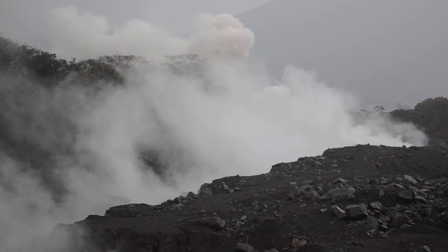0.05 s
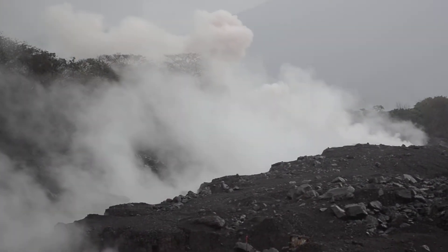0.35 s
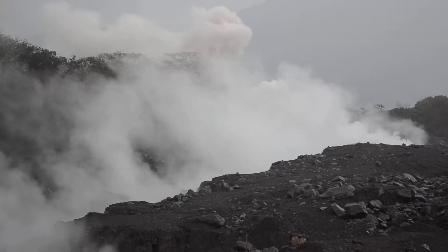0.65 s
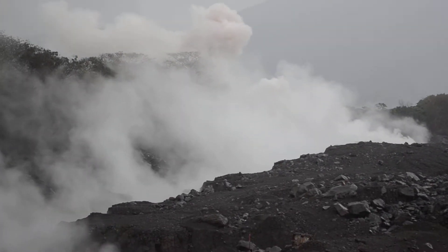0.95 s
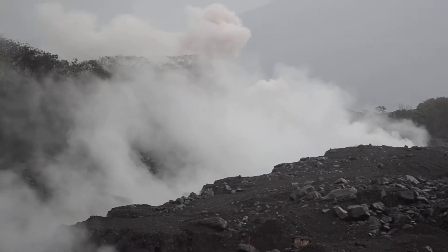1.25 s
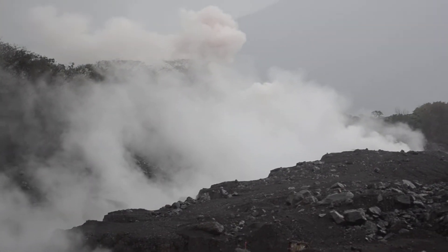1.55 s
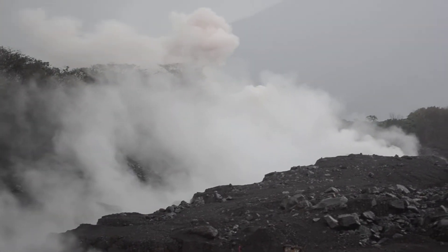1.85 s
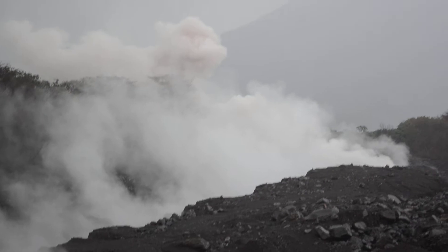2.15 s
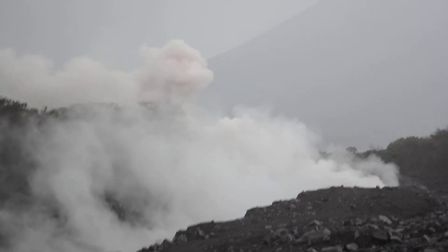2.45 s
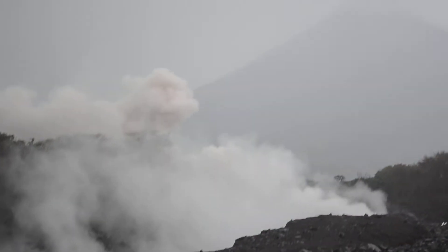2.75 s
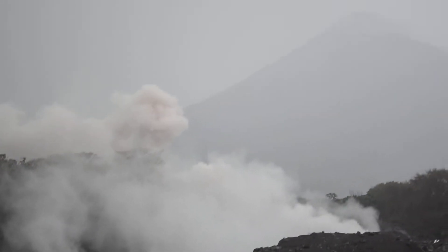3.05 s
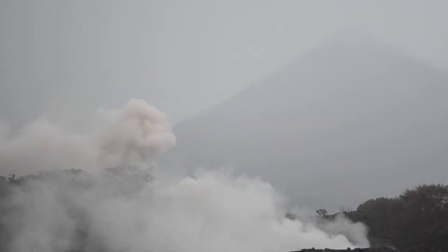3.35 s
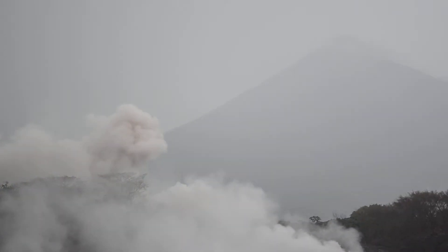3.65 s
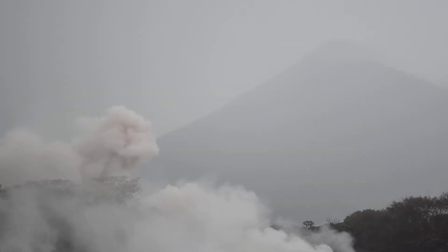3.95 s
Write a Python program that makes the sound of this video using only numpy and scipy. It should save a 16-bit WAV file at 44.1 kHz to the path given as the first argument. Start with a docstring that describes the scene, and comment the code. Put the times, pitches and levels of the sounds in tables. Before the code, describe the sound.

A hot mudflow roars steadily down a ravine for all four seconds, heard from the rim outdoors. Stones knock dully inside the roar under a faint hiss, and wind gusts buffet the microphone with a lumpy low rumble. At about 2.2 seconds a tiny tick sounds close by, and a very faint high whine grows slightly. At 3 seconds a dull pop tops a strong gust as the flow continues.

```python
"""A hot mudflow roars steadily down a ravine, heard from the rim in the open air.
From the start, colliding stones knock dully inside the roar, under a faint hiss, and gusts buffet
the microphone with a lumpy low rumble that booms near 100 and 200 Hz. At 2.2 s one tiny tick sounds
close by, and a very faint high whine then grows a little. At 3 s a dull pop tops a strong gust,
and the flow roars on."""
import sys
import numpy as np
from scipy import signal
from scipy.fft import rfft, irfft
from scipy.io import wavfile
from scipy.ndimage import uniform_filter1d

SR = 44100
rng = np.random.default_rng(int(sys.argv[2]) if len(sys.argv) > 2 else 0)


def dump(signal):
    """Clip the signal to [-1, 1] and save it as 16-bit WAV at the path in sys.argv[1]."""
    limited = np.clip(np.atleast_2d(signal).T, -1, 1)
    pcm = np.round(limited * 32767).astype(np.int16)
    wavfile.write(sys.argv[1], SR, pcm)


N = 176400

# Levels in the tables are relative; spectra give density per hertz.
# spectrum of the flow's roar (frequency [Hz], level [dB])
ROAR_SPECTRUM = [(10, -28), (24, -6), (60, -7), (130, 0.5), (345, -0.5), (395, -4), (455, 1), (490, -7.5),
                 (545, -0.5), (630, 2), (715, -1.5), (765, 1.9), (815, -2.5), (920, 1), (1040, -2.5),
                 (1200, 1), (1600, -2.5), (1900, -5.5), (2200, -7), (3000, -15), (3900, -22), (4600, -26),
                 (5600, -36.5), (8000, -41.5), (15000, -69)]
# slow swell of the roar (time [s], level [dB])
ROAR_SWELL = [(0, -0.5), (.7, -0.7), (1.6, -0.33), (2.5, -0.5), (3.05, -0.75), (3.4, -0.8), (4, -0.6)]
# narrow mid band of the roar, fading as the microphone tilts up (time [s], level [dB])
MID_BAND_LEVEL = [(0, -1), (.7, 1), (1.9, 0.7), (2.5, -2.5), (3.1, -4), (3.6, -6), (4, -8)]
# spectrum of the hiss (frequency [Hz], level [dB])
HISS_SPECTRUM = [(2000, -6.5), (5500, 0.5), (7000, -0.5), (8400, -0.5), (9600, -3.5), (12200, -5),
                 (14000, -11), (15600, -20)]
# envelope of the hiss (time [s], level [dB])
HISS_ENVELOPE = [(0, -0.5), (.9, -0.8), (1.5, 1), (2.3, .3), (3.1, -1), (3.5, -0.7), (4, -1)]
# strength of the wind on the microphone (time [s], level [dB])
GUST_ENVELOPE = [(0.0, -25.5), (0.04, -19.5), (0.15, -26.5), (0.42, -32), (0.465, -18.5), (0.49, -36),
                 (0.54, -23.5), (0.615, -34), (0.625, -28), (0.64, -15.5), (0.675, -14.5), (0.7, -13.5),
                 (0.76, -19), (0.79, -31), (0.82, -18.5), (0.86, -32), (0.885, -23), (0.97, -25),
                 (1.01, -29.5), (1.05, -17), (1.12, -24), (1.18, -16.5), (1.235, -20), (1.26, -16.5),
                 (1.3, -23.5), (1.34, -24), (1.37, -17.5), (1.4, -23.5), (1.425, -18.5), (1.51, -28.5),
                 (1.57, -25.5), (1.63, -25), (1.67, -21), (1.77, -32), (1.903, -27), (1.915, -12.5),
                 (1.943, -18), (1.965, -20.5), (1.995, -25), (2.016, -14), (2.04, -20.5), (2.07, -26.5),
                 (2.165, -20), (2.21, -24), (2.24, -29.5), (2.36, -16.5), (2.41, -25.5), (2.48, -22.5),
                 (2.525, -29), (2.555, -21), (2.645, -21), (2.665, -10.5), (2.68, -18), (2.697, -15),
                 (2.725, -29), (2.75, -13), (2.79, -24), (2.81, -18.5), (2.88, -25), (2.91, -14.5),
                 (2.965, -22.5), (2.982, -11.5), (3.035, -11), (3.065, -22.5), (3.15, -21), (3.18, -22.5),
                 (3.21, -17.5), (3.27, -25.5), (3.37, -18), (3.41, -24.5), (3.5, -16.5), (3.54, -19.5),
                 (3.6, -19), (3.655, -16), (3.7, -27), (3.72, -21.5), (3.78, -27), (3.88, -19.5),
                 (3.95, -28.5), (4.0, -27.5)]
# spectra of the wind's boom, deep push, upper edge and lowest rumble (frequency [Hz], level [dB])
BOOM_SPECTRUM = [(60, -42), (110, -12), (138, -3), (158, -2), (180, 3), (206, 2), (232, -9.5), (270, -13.5),
                 (400, -61), (1500, -78), (6000, -110)]
PUSH_SPECTRUM = [(20, -30), (50, -25), (65, -9.5), (80, -1), (98, 5), (118, -0.5), (135, 6), (165, -19),
                 (400, -37), (2000, -80), (6000, -110)]
EDGE_SPECTRUM = [(150, -44), (225, -9), (250, -4), (282, 1), (310, -4.5), (350, -0.5), (376, -7),
                 (405, -36), (450, -18), (490, -21.5), (590, -19.5), (1200, -32), (3500, -75), (8000, -110)]
SUB_SPECTRUM = [(10, -28), (22, -6), (34, 7), (48, -9), (70, -25), (200, -42), (1000, -82)]
# weights of the deep push and the upper edge against the boom (time [s], level [dB])
PUSH_WEIGHT = [(0.0, -4), (0.3, -12.5), (0.55, -10), (0.65, 6.5), (0.7, 1.5), (0.77, -11.5), (0.96, -1.5),
               (1.12, -6), (1.28, -18), (1.38, 2), (1.48, -6), (1.6, -5.5), (1.76, 5), (1.85, -5),
               (2.04, -7.5), (2.2, -0.5), (2.39, -23), (2.47, -7), (2.54, 2), (2.6, -1), (2.7, -1),
               (2.76, 7), (2.84, -9), (2.93, -14), (3.0, -7.5), (3.25, -5), (3.32, -3.5), (3.42, -8),
               (3.6, -0.5), (3.8, -9.5), (4.0, -9.5)]
EDGE_WEIGHT = [(0.0, -12), (0.52, -6.5), (0.66, -6.5), (0.96, -6), (1.2, -14.5), (1.36, -4), (1.6, -14),
               (1.82, -0.5), (1.93, -11.5), (2.04, -7.5), (2.16, 4), (2.24, -0.5), (2.45, -14.5),
               (2.55, 5.5), (2.66, -9), (2.9, -4.5), (2.98, -4), (3.03, -16.5), (3.1, -6), (3.22, -6.5),
               (3.45, -9.5), (4.0, -13.5)]
# envelope of the lowest rumble (time [s], level [dB])
SUB_ENVELOPE = [(0.0, -44), (0.59, -64), (0.69, -38), (0.8, -51), (1.2, -40), (1.57, -50), (3.0, -53),
                (3.03, -29), (3.1, -53), (3.14, -31), (3.27, -58), (3.31, -40), (3.55, -36), (4.0, -50)]
# envelope of the whine (time [s], level [dB])
WHINE_ENVELOPE = [(0, -86), (2.2, -86), (2.7, -78), (4, -79.5)]
# modes of the close tick (frequency [Hz], level [dB], duration [s])
TICK_PARTIALS = [(4900, -32.5, 0.0028), (12300, -49, .0012), (8500, -51, .002), (2500, -28.5, 0.0053)]


def amp(db):
    """The decibel scale: amplitude grows tenfold every 20 dB."""
    return 10 ** (np.asarray(db) / 20)


def unit_rms(x):
    """Normalisation to a mean power of one."""
    return x / np.sqrt(np.mean(x ** 2) + 1e-20)


def envelope(points):
    """Interpolation in decibels: a gain per sample from (time [s], level [dB]) points."""
    return amp(np.interp(np.arange(N) / SR, *np.transpose(points)))


def noise(spectrum):
    """Spectral shaping: white noise filtered to the given spectrum, at unit rms."""
    hz, db = np.transpose(spectrum)
    gain = amp(np.interp(np.log(np.fft.rfftfreq(N, 1 / SR) + 1), np.log(hz + 1), db))
    return unit_rms(irfft(rfft(rng.standard_normal(N)) * gain, N))


def smooth(x, hz):
    """Gaussian low-pass filtering: changes slower than hz remain."""
    return irfft(rfft(x) * np.exp(-.5 * (np.fft.rfftfreq(N, 1 / SR) / hz) ** 2), N)


def steadied(x, hz):
    """Compression: division by the running rms evens out level changes slower than hz."""
    x = unit_rms(x)
    power = abs(smooth(x ** 2, hz))
    return unit_rms(x / np.sqrt(power + .02))


def roar(level_db=-29, patchy_db=0.9, churn_db=0.24, churn_hz=21, mid_hz=1316, mid_width_hz=54):
    """Random modulation: churning slurry makes broad noise with drifting patches and slight flutter."""
    hz, t, spectra = signal.stft(noise(ROAR_SPECTRUM), SR, nperseg=1024, noverlap=768)
    drift = uniform_filter1d(rng.standard_normal(spectra.T.shape), size=16, axis=0)  # along time
    patches = unit_rms(uniform_filter1d(drift, size=3, axis=1)).T  # along frequency
    mid_band = np.exp(-.5 * ((hz - mid_hz) / mid_width_hz) ** 2)
    mid_db = np.outer(mid_band, np.interp(t, *np.transpose(MID_BAND_LEVEL)))
    spectra = spectra * amp(patchy_db * patches + mid_db)
    slurry = signal.istft(spectra, nperseg=1024, noverlap=768)[1][:N]
    churn = unit_rms(smooth(rng.standard_normal(N), churn_hz))
    return amp(level_db) * envelope(ROAR_SWELL) * unit_rms(slurry * amp(churn_db * churn))


def hiss(level_db=-58):
    """Filtered noise: a smooth, faint treble lies over the roar."""
    return amp(level_db) * envelope(HISS_ENVELOPE) * noise(HISS_SPECTRUM)


def stones(level_db=-49.5, knocks_per_s=120, sizes=24, low_hz=555, high_hz=2180, decay_cycles=1.1):
    """Damped vibration: stones of many sizes collide at random, each with a short, dull ring."""
    t = np.arange(2048) / SR
    knocks = np.zeros(N)
    for hz in np.geomspace(low_hz, high_hz, sizes):
        hits = rng.random(N) < knocks_per_s / sizes / SR
        strength = amp(-0.5 * np.minimum(rng.exponential(1, N), 4))  # spread over 2 dB
        age = t * hz / decay_cycles
        ring = age * np.exp(-age) * np.sin(2 * np.pi * hz * t)
        knocks += signal.oaconvolve(hits * strength, ring)[:N]
    return amp(level_db) * unit_rms(knocks)


def wind(buffet_gain_db=-1.26, edge_floor_db=-45, sub_gain_db=0.7):
    """Turbulent pressure: eddies buffet the microphone in gusts, over a faint lowest rumble."""
    boom = steadied(noise(BOOM_SPECTRUM), hz=3.8)
    push = envelope(PUSH_WEIGHT) * steadied(noise(PUSH_SPECTRUM), hz=3.8)
    edge = envelope(EDGE_WEIGHT) * steadied(noise(EDGE_SPECTRUM), hz=3.8)
    eddies = steadied(boom + push + edge, hz=13.7)  # so that the gusts set the level
    buffet = amp(buffet_gain_db) * envelope(GUST_ENVELOPE) * eddies
    edge_floor = amp(edge_floor_db) * noise(EDGE_SPECTRUM)  # persists between gusts
    sub = amp(sub_gain_db) * envelope(SUB_ENVELOPE) * steadied(noise(SUB_SPECTRUM), hz=4)
    return buffet + edge_floor + sub


def whine(hz=15665):
    """A pure tone: one very faint sinusoid at the top of hearing, louder in the second half."""
    return envelope(WHINE_ENVELOPE) * unit_rms(np.sin(2 * np.pi * hz * np.arange(N) / SR))


def tone_burst(start_s, hz, db, length_s):
    """Windowing: a sinusoid under one smooth hump; the shorter the hump, the wider the spectrum."""
    t = np.arange(N) / SR - start_s
    window = np.sin(np.pi * np.clip(t / length_s, 0, 1)) ** 2
    return amp(db) * window * np.sin(2 * np.pi * hz * t)


def tick(start_s=2.2338):
    """Superposition of modes: a few brief partials add to one tiny, dry tick close by."""
    return sum(tone_burst(start_s, hz, db, length_s) for hz, db, length_s in TICK_PARTIALS)


def pop():
    """A pressure transient: two cycles at the microphone, too brief for a pitch, make a dull pop."""
    return -tone_burst(start_s=3.0205, hz=1250, db=-18, length_s=0.0016)


def scene():
    """Linear superposition: the flow in the ravine and the sounds at the rim add in one channel."""
    flow = roar() + hiss() + stones()
    return (flow + wind() + whine() + tick() + pop())[None]


def record(dry, cutoff_hz=15700):
    """Band limiting: a steep low-pass filter removes the highest treble."""
    low_pass = signal.firwin(511, cutoff_hz, window=("kaiser", 9), fs=SR)
    return signal.oaconvolve(dry, low_pass[None], "same")


dry = scene()
out = record(dry)
dump(out)
```